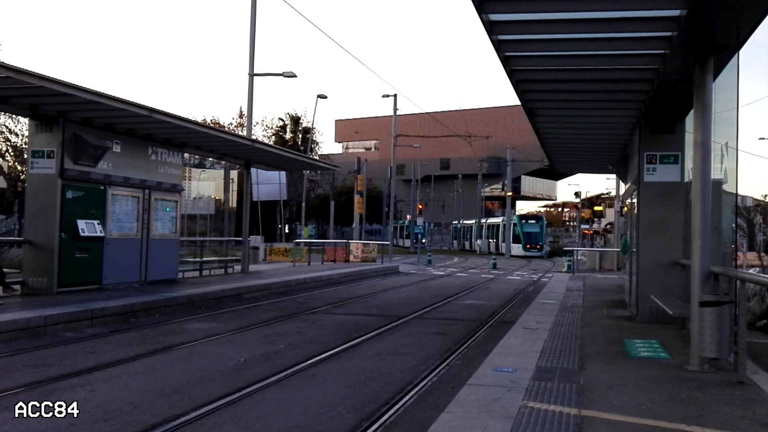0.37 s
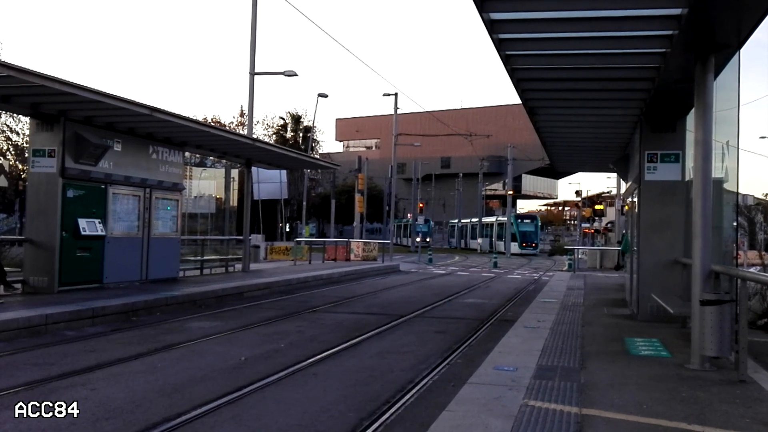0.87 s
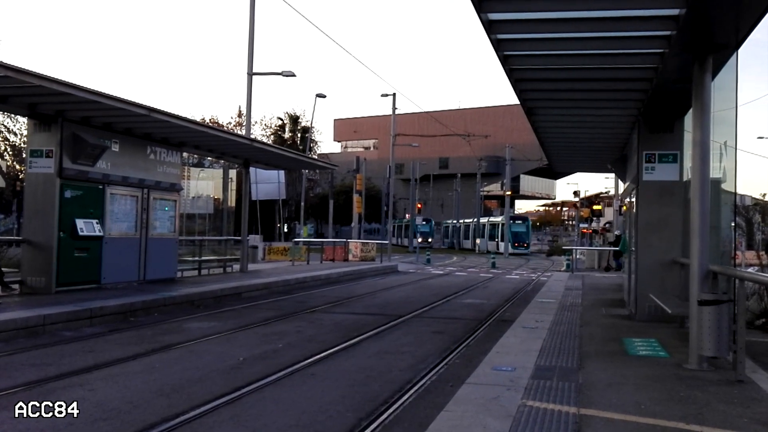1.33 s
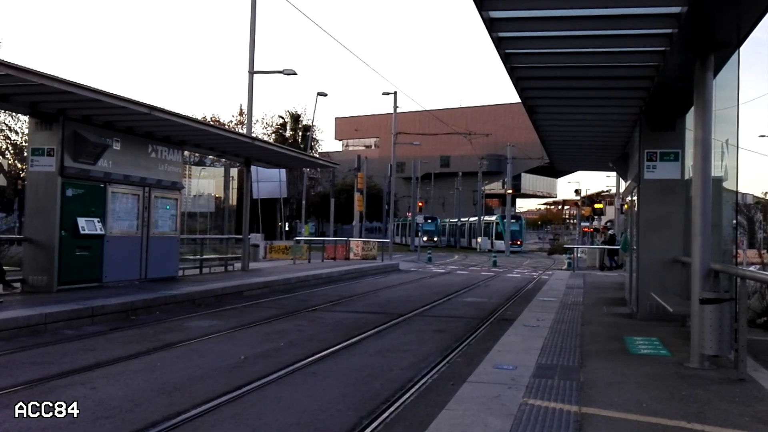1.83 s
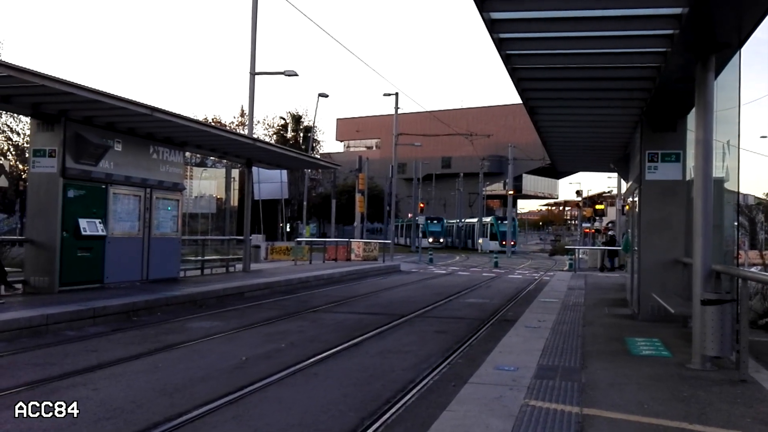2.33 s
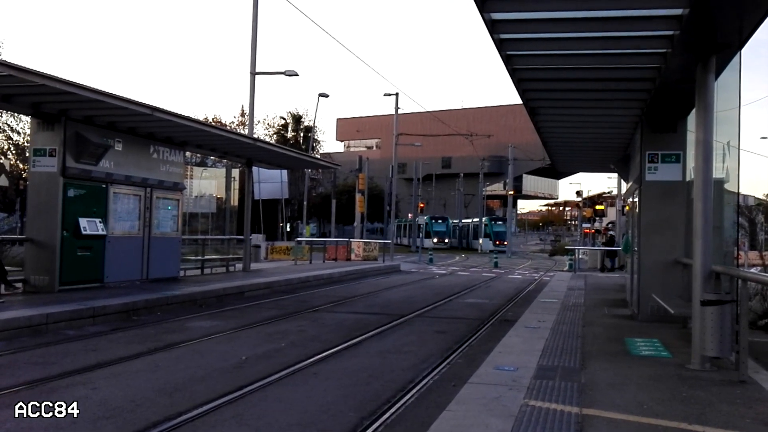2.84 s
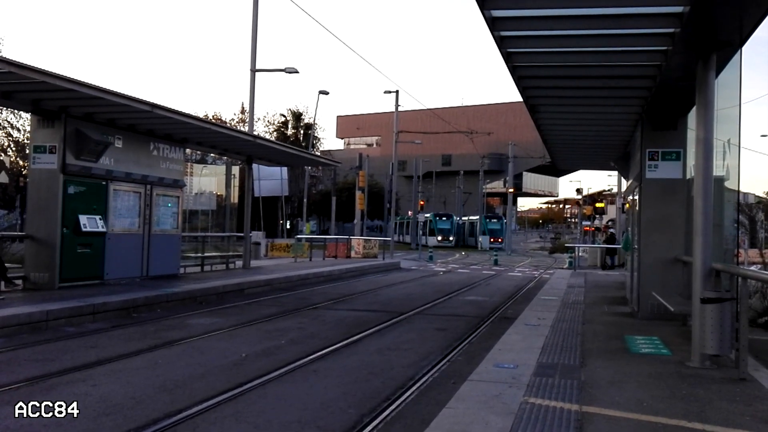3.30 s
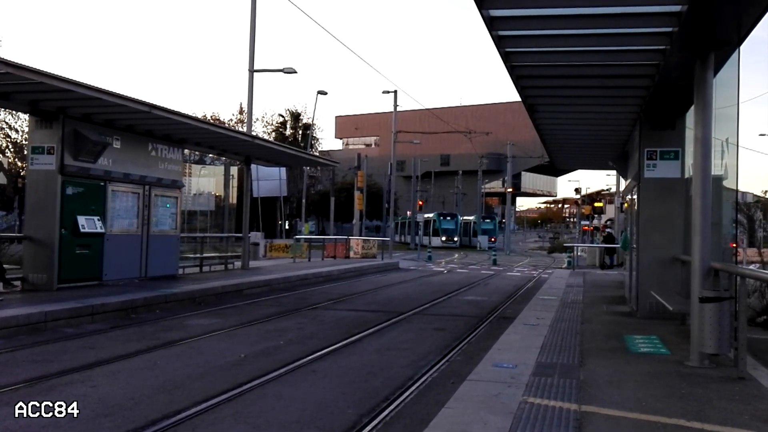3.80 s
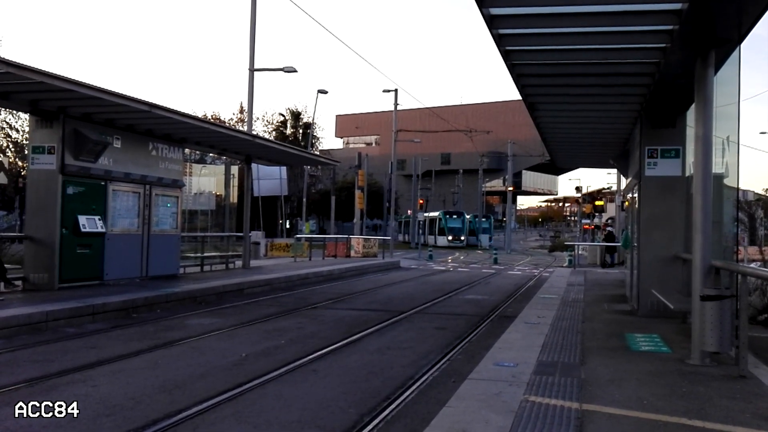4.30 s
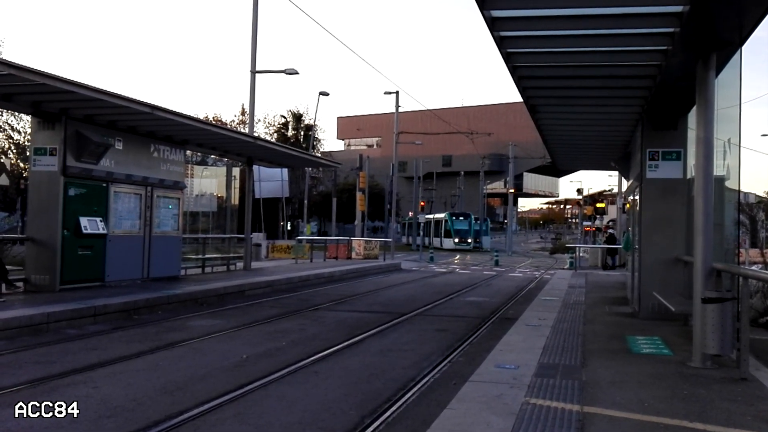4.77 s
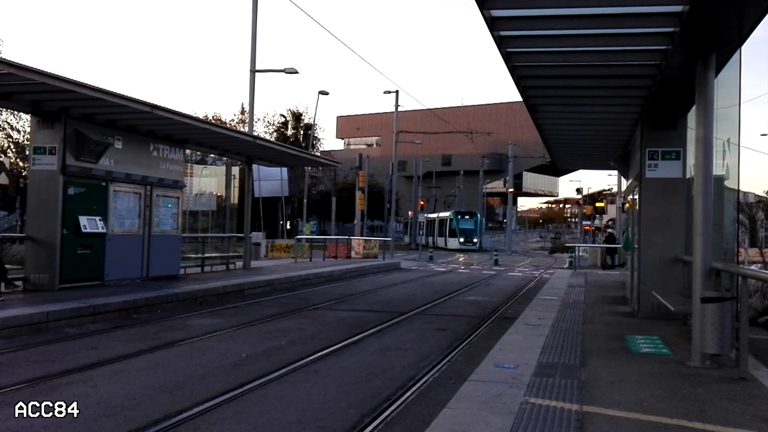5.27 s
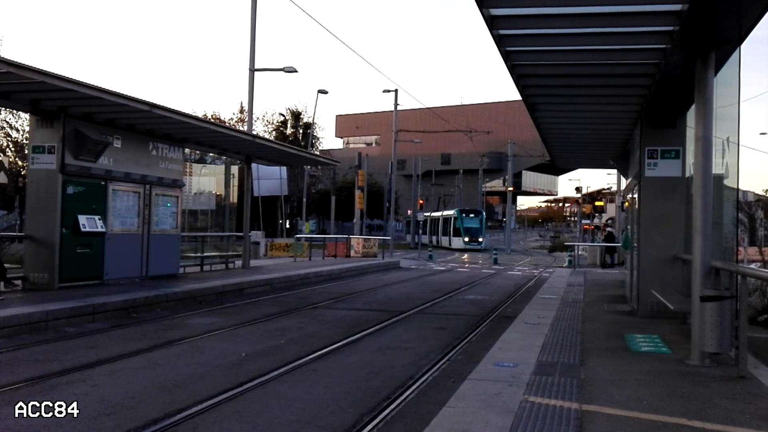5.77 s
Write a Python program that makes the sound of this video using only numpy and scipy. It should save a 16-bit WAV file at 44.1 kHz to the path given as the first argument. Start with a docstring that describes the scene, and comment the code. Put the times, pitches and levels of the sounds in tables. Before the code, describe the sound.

Low throbbing engine note rises in pitch and pulses in strength as a heavy vehicle draws level, over faint tram hum, thin squeal and hiss.

```python
"""A heavy diesel vehicle gathers speed close by a street-level tram stop between shelters: its exhaust note,
a sine at the firing rate with weaker orders, climbs. Its fan and turbine whine, wandering tones, rise with it,
and its tyre roar, shaped noise, swells as it draws level. Far off a tram rounds a curve: the drive hum sinks
and two wheel modes squeal, all sines, while flanges hiss as shaped noise. Steady city noise lies below,
with faint high cheeps and one dry tick, a high-passed impulse."""
import sys
import numpy as np
from scipy import signal
from scipy.fft import rfft, irfft
from scipy.io import wavfile

SR = 44100
rng = np.random.default_rng(int(sys.argv[2]) if len(sys.argv) > 2 else 0)


def bounce(signal):
    """Save signal as a 16-bit WAV file at the path given by the first command-line argument."""
    frames = np.transpose(np.atleast_2d(signal))
    limited = np.clip(frames, -1, 1)
    pcm = np.round(limited * 32767).astype(np.int16)
    wavfile.write(sys.argv[1], SR, pcm)


def level_to_linear(level):
    """Convert decibel levels to linear amplitude factors, elementwise."""
    exponent = np.asarray(level, float) / 20
    return 10 ** exponent


N = 259749

# Source levels below are nominal, ahead of the final saturation.
# Engine speed: time_s, firing_hz
FIRING_RATE = [(0.0, 43.9), (0.49, 52.15), (1.0, 57.75), (1.8, 65.2), (2.41, 70.0), (2.84, 72.9),
               (3.79, 77.3), (5.89, 83.22)]
# The vehicle draws level and passes: time_s, nearness_db
VEHICLE_NEARNESS = [(0, -15), (1.4, -14.5), (2.4, -11.5), (3.3, -9), (4.2, -10), (4.6, -7.5), (5.05, -4.5),
                    (5.23, 0), (5.55, -0.5), (5.89, -2.5)]
# The note fades where echoes off the shelters cancel it, swells (negative depth) where they add:
# centre_s, depth_db, length_s
EXHAUST_FADES = [(0.064, 5.5, 0.24), (0.234, 10, 0.081), (0.48, 5, 0.073), (.74, 8, 0.098), (.9, -4, 0.13),
                 (1.06, 2.5, 0.22), (1.252, 11, 0.19), (1.36, 24, 0.041), (1.707, 11, 0.19),
                 (2.052, 2.5, 0.36), (2.3, 8, 0.22), (2.845, 9.5, 0.24), (3.324, 8.5, 0.37),
                 (3.85, 8, 0.52), (4.3, 4, .12), (4.0, 10, .06), (4.71, 8.5, 0.33), (4.972, -2, .25),
                 (5.7, 9.5, 0.72)]
# Orders of the engine, as multiples of the firing rate
ORDER_RATIOS = (.5, 1.5, 2.0, 3.0)
# Uneven cylinders, one row for each order: abreast_db, share of the nearness swing
ORDER_LEVELS = [(-28, 0.16), (-30, 0.078), (-39, 0.11), (-39.5, 0.074)]
# An order stands out for a moment: centre_s, multiple of the firing rate, rise_db, length_s
ORDER_RISES = [(.3, 2.0, 9, .5), (.75, 1.5, 5, .3), (1.47, 1.5, 5, .3), (2.25, 1.5, 7.5, .6),
               (2.6, .5, 1, 1.0), (3.05, 1.5, 2, 0.56), (3.7, 1.5, 2, .3), (3.9, .5, 5, .7),
               (4.9, .5, 2, .3), (5.35, 1.5, 7, 0.42), (5.45, .5, -2, .3), (5.85, 2.0, 14, .5)]
# Cooling fan spins up and settles: time_s, blade_hz
FAN_SPEED = [(0, 215), (.7, 241.3), (1.5, 280.4), (2.2, 309.7), (3.0, 333.1), (3.6, 338), (5.1, 338.1),
             (5.89, 336)]
# Fan overtones: multiple of the blade rate, level_db against the blade tone
FAN_OVERTONES = [(2.0, -18.5), (4.06, -18), (5.06, -28)]
# The fan swells briefly: centre_s, rise_db, length_s
FAN_RISES = [(1.147, 6, .3), (1.448, 2, 0.22), (1.896, 5.5, 0.11), (3.2, 1.5, 0.16), (3.5, 2, .2),
             (4.485, 5.5, .2), (5.06, 7, .2), (5.284, 4, .15), (5.499, 4, 0.12)]
# Turbine whistle: time_s, pitch_hz, level_db
TURBINE_WHISTLE = [(0, 6800, -80), (2.9, 7080, -76), (3.3, 7220, -64), (3.7, 7380, -61), (4.1, 7520, -61),
                   (4.6, 7680, -64), (4.9, 7750, -65), (5.1, 7820, -59), (5.4, 7855, -58), (5.6, 7865, -59),
                   (5.89, 7890, -59)]
# Moments when the whistle comes through clearly: centre_s, rise_db, length_s
WHISTLE_RISES = [(3.67, 7, .04), (3.75, 13, .07), (3.89, 11, .06), (4.06, 10, .05), (4.145, 10, .05),
                 (4.36, 7, .03), (4.6, 7, .1), (4.98, 8, .05), (5.1, 6, .1), (5.22, 6, .08), (5.33, 8, .1),
                 (5.48, 11, .07), (5.63, 10, .07), (5.7, 8, .05), (5.82, 12, .08)]
# Tram drive slowing: time_s, lower_hum_hz, lower_hum_db, upper_hum_db
TRAM_DRIVE = [(0, 108.5, -44, -53), (.7, 110, -28, -55), (1.3, 112, -33, -51), (2.0, 112, -33, -58),
              (2.4, 109.7, -15, -27), (2.6, 107.6, -51, -35), (2.9, 106, -24, -30.5), (3.4, 99, -23.5, -28),
              (3.8, 93.8, -19, -30.5), (4.3, 89.93, -28.5, -34), (4.8, 87.7, -71, -36),
              (5.89, 86.06, -46, -47)]
# Spells of wheel squeal: start_s, end_s, upper_mode_db, lower_mode_db
SQUEAL_SPELLS = [(0.06, .38, -58, -52.5), (0.448, .8, -55, -60), (.84, 1.08, -52, -66),
                 (1.1, 1.32, -57, -56), (1.4, 1.58, -57, -61), (1.6, 1.784, -50.5, -65),
                 (1.84, 2.2, -54.5, -63), (2.28, 2.68, -54, -64), (2.74, 3.12, -56, -59),
                 (3.15, 3.501, -60, -61), (3.7, 4.15, -57, -61), (4.179, 4.44, -52, -59),
                 (4.518, 4.66, -51, -70), (4.7, 4.84, -55, -68), (4.92, 5.3, -56, -62)]
# Upper and lower wheel modes: pitch_hz
WHEEL_MODES = (6720, 6664)
# Flanges bear on the rail through the curve: time_s, hiss_db
FLANGE_CONTACT = [(0, -56), (.7, -47.5), (1.5, -47.5), (2.1, -44.5), (3.6, -39), (4.75, -45), (5.39, -35.5),
                  (5.89, -39.5)]
# Noise spectra, relative power density, each: frequency_hz, density_db
RUMBLE_SPECTRUM = [(12, -10), (25, -5), (45, 5.5), (70, 8), (110, -8.5), (150, -3), (185, -3.5), (205, 4.5),
                   (218, 0), (235, 2.5), (265, -6.5), (320, -9), (450, -14.5), (700, -58)]
ROAR_SPECTRUM = [(200, -28), (430, 2.5), (690, -0.5), (1000, 0.5), (1700, -12.5), (2500, -7.5),
                 (3500, -7.5), (5000, -16.5), (6500, -34), (8200, -27), (10500, -50), (12500, -60)]
TREAD_SPECTRUM = [(900, -14), (1300, -0.5), (1500, 3.5), (1720, 4.5), (2050, 0.5), (2300, -7), (3500, -14),
                  (4700, -6), (5800, -16.5), (7300, -23), (8300, -34), (11000, -48)]
HISS_SPECTRUM = [(2000, -6), (3500, -12.5), (4600, -4), (5500, 1.5), (6100, -4), (7500, -9.5),
                 (8150, -14.5), (8400, -18.5), (9600, -18.5), (11000, -27), (13000, -55)]
CITY_SPECTRUM = [(59, -2.5), (100, 1), (158, -8.5), (233, -7), (512, -29.5), (713, -31), (1270, -25.5),
                 (1730, -31), (2050, -34), (4310, -41.5), (5410, -40), (6250, -46.5), (6790, -51),
                 (8350, -52.5), (14000, -53.5)]
# Faint high cheeps: centre_s, pitch_hz, level_db, length_s
CHEEP_TONES = [(.265, 8600, -66, .03), (.285, 8280, -67, .02), (.34, 8450, -65, .03), (.40, 8180, -66, .03),
               (2.835, 9000, -64, .025), (3.05, 9230, -63, .025), (3.11, 9230, -61, .045),
               (3.30, 9300, -65, .04), (4.2, 9050, -65, .03), (4.27, 9050, -62, .04)]
# A dry tick close by: time_s, impulse_db ahead of the high-pass
TICK_IMPULSES = [(5.604, -38)]


def in_time(rows):
    """Linear interpolation of a table's columns, one value per sample."""
    s, *columns = np.transpose(rows)
    return [np.interp(np.arange(N) / SR, s, c) for c in columns]


def rms_one(x):
    """Normalisation to unit rms."""
    return x / np.sqrt(np.mean(x ** 2) + 1e-20)


def drift(corner_hz):
    """Slow random fluctuation of unit rms: white noise through two equal one-pole low-passes."""
    step = 40  # samples between coarse values
    pole = np.exp(-2 * np.pi * corner_hz * step / SR)
    noise = rng.standard_normal(N // step + 2002)
    slow = signal.lfilter([1], [1, -2 * pole, pole * pole], noise)[2000:]  # settled part
    return np.interp(np.arange(N) / step, np.arange(len(slow)), rms_one(slow))


def swell(centre_s, length_s):
    """Gaussian envelope of unit height."""
    return np.exp(-8 * ((np.arange(N) / SR - centre_s) / length_s) ** 2)


def swells_db(rows):
    """Superposition, in decibels, of Gaussian changes of level."""
    return sum(db * swell(centre_s, length_s) for centre_s, db, length_s in rows)


def spell(start_s, end_s):
    """Envelope near unit height between two times, with hyperbolic-tangent edges."""
    t = np.arange(N) / SR
    edge_s = 0.056
    return .5 * (np.tanh((t - start_s) / edge_s) - np.tanh((t - end_s) / edge_s))


def coloured(spectrum, flicker_db):
    """Random noise shaped by a spectral density, scaled to unit rms, with a slightly flickering level."""
    hz, density_db = np.transpose(spectrum)
    bins_hz = np.maximum(np.fft.rfftfreq(N, 1 / SR), 1)
    gain = level_to_linear(np.interp(np.log(bins_hz), np.log(hz), density_db, left=-99))
    shaped = irfft(gain * rfft(rng.standard_normal(N)), N)
    return rms_one(shaped * level_to_linear(flicker_db * drift(23.0)))


def tone(hz, waver_db, wander_hz, rate):
    """Sinusoid randomly modulated in amplitude and frequency, as air and echoes blur it; rate in Hz."""
    cycles = np.cumsum(hz + wander_hz * drift(rate)) / SR
    phase = 2 * np.pi * (cycles + rng.random())
    level_db = waver_db * (np.minimum(drift(rate), 1) - .5)
    return np.sqrt(2) * np.sin(phase) * level_to_linear(level_db)


def diesel(near_db):
    """Periodic combustion radiates at the firing rate; uneven cylinders add weaker orders that come and go."""
    hz, = in_time(FIRING_RATE)
    abreast_db, near_share = -10, 0.24
    note_db = abreast_db + near_share * near_db - swells_db(EXHAUST_FADES)
    out = level_to_linear(note_db) * tone(hz, waver_db=1.0, wander_hz=0.5, rate=20.5)
    for ratio, (order_db, share) in zip(ORDER_RATIOS, ORDER_LEVELS):
        rises = [(s, db, length) for s, multiple, db, length in ORDER_RISES if abs(multiple - ratio) < .2]
        level_db = order_db + share * near_db + swells_db(rises)
        out = out + level_to_linear(level_db) * tone(ratio * hz, waver_db=2.0, wander_hz=0.92, rate=3.75)
    return out


def fan(near_db):
    """Blade passage yields a broken, grainy tone at the blade rate and a few blurred overtones."""
    hz, = in_time(FAN_SPEED)
    abreast_db, near_share = -30, 0.62
    level_db = abreast_db + near_share * near_db + swells_db(FAN_RISES)
    overtones = sum(level_to_linear(db) * tone(ratio * hz, waver_db=4.5, wander_hz=6.22, rate=8.73)
                    for ratio, db in FAN_OVERTONES)
    blade = tone(hz, waver_db=4.0, wander_hz=3.5, rate=14.0)
    return level_to_linear(level_db) * (blade + overtones)


def turbine():
    """A thin whistle whose random modulation breaks it into chirps, as in moving air."""
    hz, level_db = in_time(TURBINE_WHISTLE)
    level_db = level_db + swells_db(WHISTLE_RISES)
    return level_to_linear(level_db) * tone(hz, waver_db=3.0, wander_hz=22.0, rate=25.0)


def tram_drive():
    """Rotating machinery hums at two pitches in fixed ratio, which sink as the tram slows."""
    hz, lower_db, upper_db = in_time(TRAM_DRIVE)
    upper_ratio = 1.66
    lower = level_to_linear(lower_db) * tone(hz, waver_db=8.0, wander_hz=1.1, rate=3.6)
    upper = level_to_linear(upper_db) * tone(upper_ratio * hz, waver_db=4.5, wander_hz=2.34, rate=2.64)
    return lower + upper


def ground_rumble(near_db):
    """Low-frequency noise through the ground, building exponentially as the vehicle pulls away from rest."""
    abreast_db, near_share = -18.5, 0.6
    start_deficit_db, build_s = 20, 0.73
    deficit_db = start_deficit_db * np.exp(-np.arange(N) / SR / build_s)
    level_db = abreast_db + near_share * near_db - deficit_db
    return level_to_linear(level_db) * coloured(RUMBLE_SPECTRUM, flicker_db=2.0)


def tyre_roar(near_db):
    """Tyres on the road radiate broadband noise; brighter tread bands follow nearness more strongly."""
    roar_db, roar_share = -29.5, .95
    tread_db, tread_share = -30, 1.144
    roar = level_to_linear(roar_db + roar_share * near_db) * coloured(ROAR_SPECTRUM, flicker_db=.5)
    tread = level_to_linear(tread_db + tread_share * near_db) * coloured(TREAD_SPECTRUM, flicker_db=1.0)
    return roar + tread


def flange_hiss():
    """Friction of flanges on rail, as shaped noise whose level varies through the curve."""
    hiss_db, = in_time(FLANGE_CONTACT)
    return level_to_linear(hiss_db) * coloured(HISS_SPECTRUM, flicker_db=1.0)


def city():
    """Diffuse background: stationary shaped noise at a nearly constant level."""
    return level_to_linear(-25) * coloured(CITY_SPECTRUM, flicker_db=0.5)


def wheel_squeal():
    """Two close wheel modes sound in spells on the curve, each a narrow wavering tone."""
    envelopes = sum(level_to_linear(np.array(modes_db))[:, None] * spell(start_s, end_s)
                    for start_s, end_s, *modes_db in SQUEAL_SPELLS)
    return sum(envelope * tone(mode_hz, waver_db=4.5, wander_hz=3.0, rate=18.0)
               for mode_hz, envelope in zip(WHEEL_MODES, envelopes))


def cheeps():
    """Short frequency-modulated tones under Gaussian envelopes."""
    # A negative waver turns the level swings upward.
    return sum(level_to_linear(db) * swell(centre_s, length_s) * tone(hz, waver_db=-4.0, wander_hz=39.6, rate=27.0)
               for centre_s, hz, db, length_s in CHEEP_TONES)


def ticks():
    """The impulse response of a high-pass filter: a bare click with its lows cut."""
    clicks = np.zeros(N)
    for time_s, db in TICK_IMPULSES:
        clicks[round(time_s * SR)] = level_to_linear(db)
    return signal.lfilter(*signal.butter(2, 9000, "high", fs=SR), clicks)


def scene():
    """Linear superposition of all sources at one microphone."""
    near_db, = in_time(VEHICLE_NEARNESS)
    vehicle = diesel(near_db) + fan(near_db) + turbine() + ground_rumble(near_db) + tyre_roar(near_db)
    tram = tram_drive() + flange_hiss() + wheel_squeal()
    return (vehicle + tram + city() + cheeps() + ticks())[None]


def band_limit(x):
    """A steep low-pass at the top of the band."""
    return signal.sosfilt(signal.butter(12, 15240, fs=SR, output="sos"), x)


def record(dry):
    """Saturation gently rounds the peaks; a steep elliptic low-pass then removes the top."""
    rounded = 1.838 * np.tanh(dry / 1.423)
    top_cut = signal.ellip(14, .5, 60, 14290, fs=SR, output="sos")  # ripple and stopband in dB, edge in Hz
    finished = signal.sosfilt(top_cut, rounded)
    return band_limit(finished)


dry = scene()
out = record(dry)
bounce(out)
```